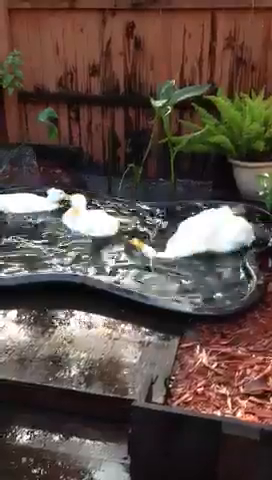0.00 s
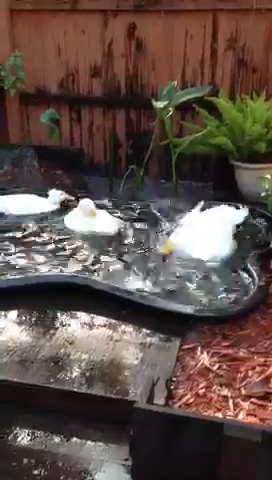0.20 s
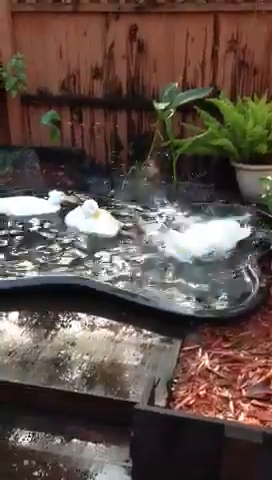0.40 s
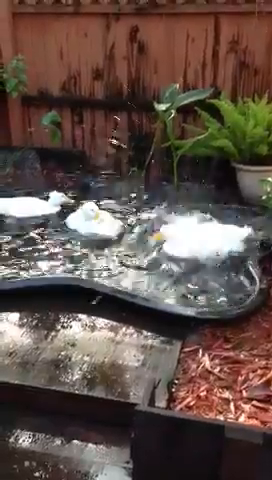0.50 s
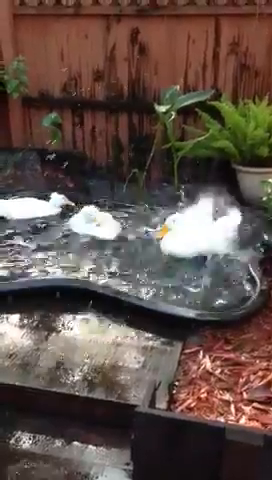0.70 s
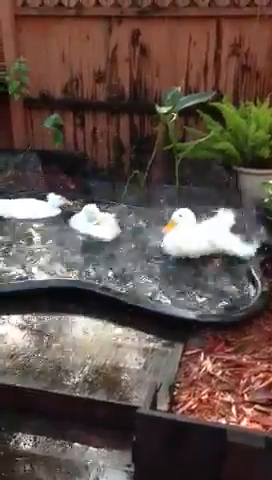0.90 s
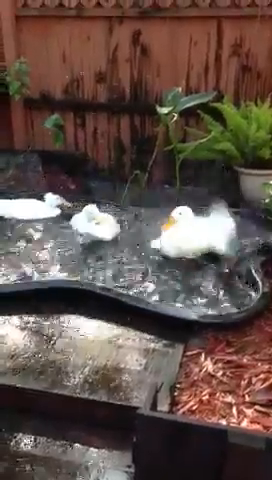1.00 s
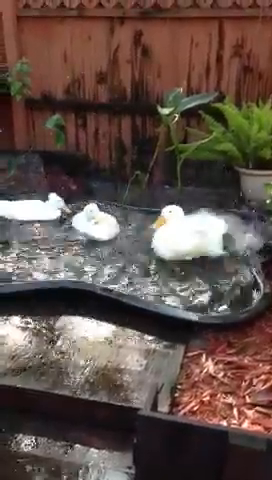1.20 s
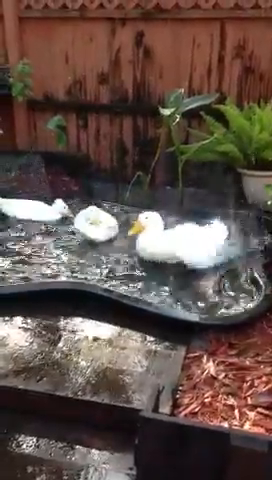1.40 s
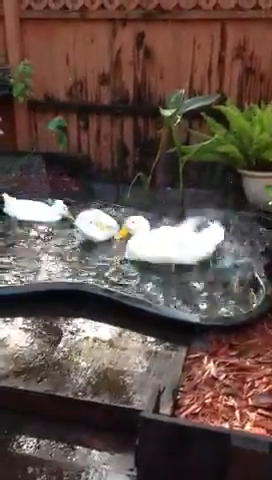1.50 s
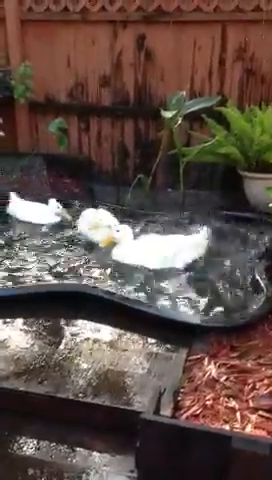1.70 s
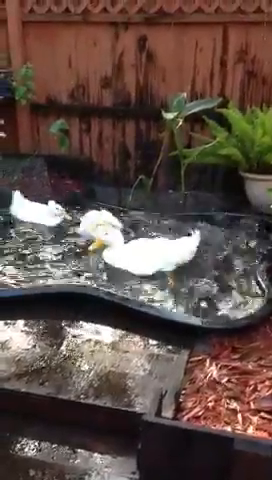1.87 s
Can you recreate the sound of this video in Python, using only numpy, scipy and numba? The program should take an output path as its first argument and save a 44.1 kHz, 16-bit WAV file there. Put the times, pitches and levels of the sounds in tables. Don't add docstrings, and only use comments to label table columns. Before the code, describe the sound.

Duck bathing in a garden pond: wing slaps crack on the water, then drops tick and fizz out

```python
import sys
import numpy as np
from scipy import signal
from scipy.fft import rfft, irfft
from scipy.io import wavfile
from scipy.ndimage import uniform_filter1d
from numba import njit

SR = 44100
rng = np.random.default_rng(int(sys.argv[2]) if len(sys.argv) > 2 else 0)


def volts(x):
    e = np.asarray(x, float) / 20
    return 10 ** e


def wav_out(sig):
    wavfile.write(sys.argv[1], SR, np.round(np.clip(np.atleast_2d(sig).T, -1, 1) * 32767).astype(np.int16))


N = 85995


def unit(x):
    return x / np.sqrt(np.mean(x ** 2))


def spectrum_db(table, hz):
    f, db = np.array(table).T
    return np.interp(np.log(np.maximum(hz, 1)), np.log(f), db)


def noise(table, lean=lambda hz: 1):
    hz = np.arange(N // 2 + 1) * SR / N
    gain = volts(spectrum_db(table, hz)) * lean(hz)
    return unit(irfft(rfft(rng.standard_normal(N)) * gain, N))


def walk(rate_hz):
    k = int(SR / rate_hz)
    steps = np.repeat(rng.standard_normal(N // k + 1), k)
    return 1.35 * uniform_filter1d(uniform_filter1d(steps, k), k)[:N]


@njit
def ring(start, hz, size, cycles, rise, onset, n, sr):
    out = np.zeros(n)
    for k in range(len(start)):
        f, phase, first = hz[k], 0., int(start[k] * sr)
        fade = np.exp(-f / (cycles[k] * sr))
        swell = np.exp(-f / (onset * cycles[k] * sr))
        level, unswollen, climb = size[k], 1., 1 + rise * f / sr
        last = min(n, first + int(6 * cycles[k] * sr / hz[k]))
        for i in range(max(first, 0), last):
            out[i] += level * (1 - unswollen) * np.sin(phase)
            phase += 2 * np.pi * f / sr
            level *= fade
            unswollen *= swell
            f = min(f * climb, .45 * sr)
    return out


def bubbles(start, hz, size, cycles, rise=0.01247):
    start = np.asarray(start, float)
    hz = np.clip(hz, 100, 15000.) + 0 * start
    cycles = np.maximum(cycles, .3) + 0 * start
    onset_share = .3
    return ring(start, hz, size + 0 * start, cycles, float(rise), onset_share, N, float(SR))


# (frequency [Hz], level [dB per Hz])
WATER_COLOUR = [(240, -47), (400, -11.5), (633, -11.5), (2030, -6), (3510, -5), (7210, -5), (13100, -14),
                (15500, -32)]


def swarm(start, hz, octaves, cycles, scatter_db):
    u = rng.random((len(start), 2))
    f = np.clip(hz * 2 ** (octaves * rng.standard_normal(len(start))), 250, 15000)
    loudness = np.minimum(-np.log(u[:, 0]), 2.2)
    size = volts(scatter_db * loudness + .5 * spectrum_db(WATER_COLOUR, f)) * np.sqrt(f)
    return unit(bubbles(start, f, size, cycles * (.5 + u[:, 1])))


def spray(hz):
    spread_octaves = 4.8
    return noise(WATER_COLOUR, lambda f: np.exp(-.5 * (np.log2(np.maximum(f, 1) / hz) / spread_octaves) ** 2))


# (time [s], level [dB], rise [s], fall [s],
# centre [Hz])
SPLASHES = [(.228, -42.5, 0.018, 0.036, 3410), (.27, -63, 0.003, 0.014, 3260),
            (0.319, -41.5, 0.0028, 0.0067, 1685), (.333, -28, .009, 0.0039, 2788),
            (.465, -40, 0.0032, 0.0085, 3850), (.485, -42, 0.0088, 0.0086, 1830),
            (.527, -39.5, 0.0022, 0.009, 3500), (.55, -41, 0.015, 0.021, 1910),
            (.672, -38.5, 0.011, 0.027, 1840), (0.763, -38, 0.0086, 0.0066, 2510),
            (.805, -38.5, 0.022, 0.014, 2540), (.829, -34.5, 0.0039, 0.0058, 6000),
            (.962, -29.5, 0.0087, 0.0079, 3430), (.98, -39.5, 0.0035, 0.017, 3800),
            (1.0818, -20.5, 0.00094, 0.0026, 4360), (1.095, -54, 0.023, 0.013, 2920),
            (1.194, -43.5, .004, 0.0077, 1950), (1.213, -33, 0.002, 0.0099, 3900),
            (1.318, -39.5, 0.0036, 0.0073, 718), (1.3352, -27.5, 0.0013, 0.0035, 4190),
            (1.39, -44, 0.021, 0.016, 1720), (1.481, -30.5, 0.0012, 0.006, 4920),
            (1.671, -46, 0.011, 0.0071, 4640), (1.695, -45, 0.0053, 0.0051, 3380),
            (.03, -60, 0.011, 0.078, 6070), (.208, -50, 0.0011, .015, 2980), (.7, -55, 0.0073, 0.0052, 3600),
           (.783, -37.5, 0.0053, 0.0067, 3920), (1.135, -80, .015, 0.017, 1600),
           (1.52, -50.5, 0.0083, 0.027, 1810), (1.756, -52.5, 0.0049, 0.0043, 4530),
           (1.812, -50.5, 0.0093, 0.0061, 4950), (1.889, -61, 0.0068, 0.0058, 4600),
           (.088, -53, 0.0035, 0.0065, 3330), (1.45, -46.5, 0.004, 0.0054, 2480)]


def splashes(t, count=130):
    spray_db = -5
    out = np.zeros(N)
    for s, db, rise, fall, hz in SPLASHES:
        rise, fall = max(rise, 3e-4), max(fall, 1e-3)
        u = rng.random((count, 2))
        side = np.where(u[:, 1] < rise / (rise + fall), rise, -fall)
        start = s + .5 * np.log(u[:, 0]) * side
        burst = swarm(start, hz, 1.0, 3.5, 5) * np.sqrt((rise + fall) / 2 * SR / N)
        swell = np.exp(np.where(t < s, (t - s) / rise, (s - t) / fall))
        out += volts(db) * (burst + volts(spray_db) * swell * spray(hz))
    return out


# (time [s], crack [dB], crack [Hz], body [dB], body [Hz])
SLAPS = [
    (0.325, -12.5, 2450, -40, 1200),
    (0.9621, -9, 3030, -23.5, 500),
    (1.0816, -10, 3750, -20, 306),
    (1.2099, -14, 1070, -34, 490),
    (1.3352, -9.5, 2270, -22, 604),
    (1.4826, -11.5, 2700, -16.5, 567),
]


def slaps():
    s, db, hz, body_db, body_hz = np.array(SLAPS).T
    crack = bubbles(s, hz, volts(db - 4.0), .9, 0)
    body = bubbles(s, body_hz, volts(body_db - 8.5), 1.2)
    return crack + body


# (time [s], pitch [Hz], peak level [dB], ringing [cycles])
POCKETS = [(.312, 1330, -24, 1.5), (0.311, 2880, -33, 3), (0.3242, 1710, -17.5, 0.95),
           (0.326, 2680, -29, 3.9), (0.3341, 2080, -22, 2.2), (0.3309, 5160, -29, 2.5),
           (0.9552, 1290, -30.5, 2.4), (.9555, 3070, -31, 2.5), (.9592, 1080, -18.5, 0.7),
           (0.9638, 2800, -36, 1.3), (0.964, 5800, -19, 2.6), (1.0668, 600, -31, 1),
           (1.0812, 5760, -13.5, 2.8), (1.0818, 2080, -15.5, 2), (1.0812, 593, -25, 0.75),
           (1.084, 2630, -29, 1.4), (1.1906, 1150, -36, 2.2), (1.1928, 2880, -27, 3.6),
           (1.198, 1250, -41, 1.8), (1.213, 5600, -21, 3.7), (1.2132, 1930, -20.5, 0.76),
           (1.317, 890, -29, 0.98), (1.3297, 880, -22.5, 0.78), (1.3358, 1880, -20, 2.2),
           (1.4795, 1360, -21, 0.98), (1.4793, 7100, -19, 3.8), (1.4844, 1810, -15.5, 1.85),
           (1.498, 3900, -30, 3), (.447, 2460, -38.5, 6.8), (.507, 1610, -33, 4), (.526, 2900, -31, 4),
           (.539, 1030, -33.5, 5), (0.548, 1370, -29, 3.8), (0.549, 1890, -33, 6.8), (0.555, 2630, -27, 5),
           (.6, 1160, -35.5, 4.4), (.659, 2660, -27.5, 4.6), (0.6667, 2100, -25.5, 3),
           (.666, 3050, -28, 3.1), (.68, 1550, -33, 3), (0.703, 2850, -32, 4), (.754, 1450, -32, 7.8),
           (0.7652, 2290, -28, 2.8), (.805, 1710, -30, 3.4), (.81, 1180, -33, 2.8), (0.329, 1430, -32, 1.1),
           (.322, 2300, -26, 2.8), (0.338, 2580, -31, 2.5), (1.3351, 3280, -17.5, 1.6),
           (1.082, 1010, -20, 1)]


def pockets():
    s, hz, db, cycles = np.array(POCKETS).T
    return bubbles(s, hz, volts(db + 2), cycles, rise=0.0076)


# (time [s], pitch [Hz], peak level [dB], ringing [cycles])
BUBBLES = [(0.0874, 2570, -29, 3.1), (0.104, 779, -36.5, 12), (0.27, 3050, -27, 6.1),
           (0.3164, 2800, -19.5, 3.8), (0.3312, 1640, -14, 1.3), (.444, 666, -37.5, 4.8),
           (.477, 1980, -30.5, 6.7), (.488, 950, -26.5, 2.1), (.6735, 865, -23, 2.15),
           (0.7642, 1530, -26, 3.8), (0.884, 1700, -44, 7.2), (1.178, 1247, -39, 12),
           (1.256, 1147, -36, 7.2), (1.36, 1920, -37.5, 8.7), (1.451, 800, -35, 2.6),
           (1.483, 898, -24, 3.5), (1.54, 760, -36.5, 2.4), (1.587, 1250, -41, 7.1),
           (1.608, 4430, -35.5, 6.5), (1.6695, 3250, -30, 3.8), (1.676, 4660, -28.5, 3.3),
           (1.679, 3830, -27.5, 3), (1.678, 1550, -38, 4.4), (1.706, 1095, -41.5, 4.9),
           (.165, 1000, -33, 2), (1.4815, 535, -23, 2.1), (1.752, 4060, -35, 4.2),
           (1.7588, 3050, -31.5, 3.5), (1.815, 3300, -35.5, 3.6), (1.8876, 4530, -34, 4.3),
           (1.0812, 2000, -10.5, 1.3)]


def single_bubbles():
    s, hz, db, cycles = np.array(BUBBLES).T
    return bubbles(s, hz, volts(db + 0.5), cycles, rise=.005)


# (time [s], start pitch [Hz], peak level [dB], ringing [cycles], rise [per cycle])
CHIRPS = [
    (.128, 818, -41, 22, 0.0172),
    (.186, 474, -47, 5.6, 0.048),
    (.304, 786, -40, 8, .07),
    (0.884, 987, -38.5, 13.5, 0.024),
    (1.729, 2460, -40.5, 24, 0.0092),
]


def chirps(t):
    burst_s = .004
    out = np.zeros(N)
    for s, hz, db, cycles, rise in CHIRPS:
        until_burst = np.clip((s + cycles / hz - t) / burst_s, 0, 1)
        out += bubbles([s], hz, volts(db + 0.5), cycles, rise) * until_burst
    return out


# (time [s], peak level [dB], pitch [Hz])
THUMPS = [(0.274, -38.5, 276), (0.315, -38.5, 186), (0.945, -32.5, 289), (0.959, -33, 194),
          (1.0745, -32.5, 200), (1.206, -35, 286), (1.315, -42, 239), (1.477, -38.5, 222),
          (1.276, -46, 313), (1.329, -44, 270), (1.553, -50, 330)]


def thumps():
    s, db, hz = np.array(THUMPS).T
    return bubbles(s, hz, volts(db + 6.5), 1.4, rise=0.012)


# (time [s], pitch [Hz], peak level [dB])
DROPS = [(0.0772, 9200, -38), (.119, 7160, -39.5), (0.192, 8100, -43), (.868, 4970, -28.5),
         (0.972, 7240, -25), (1.0525, 7360, -32), (1.287, 4440, -31), (1.3307, 7900, -23),
         (1.5066, 6700, -31), (1.584, 4600, -41), (1.589, 6500, -46), (1.618, 5340, -36.5),
         (1.7, 10500, -37), (1.7336, 5760, -39), (1.759, 6240, -42.5), (1.798, 4400, -41),
         (1.815, 5600, -49), (.829, 9800, -31.5), (0.869, 7300, -35), (1.482, 11460, -28),
         (0.239, 6460, -34), (.261, 5500, -34.5), (.467, 6060, -27.5), (.52, 5100, -29.5),
         (0.578, 6300, -32)]


def drops():
    ring_s = .00033
    s, hz, db = np.array(DROPS).T
    return bubbles(s, hz, volts(db + 9.0), ring_s * hz, rise=0)


# (time [s], level [dB])
STIR = [(0.0, -62.5), (0.14, -57), (0.27, -46.5), (0.412, -46), (0.678, -42), (0.944, -46), (1.314, -44),
        (1.618, -49), (1.802, -56), (1.95, -58)]


def churn(t, fizz_count=6000, gurgle_count=700):
    fizz = swarm(rng.random(fizz_count) * N / SR, 3988, 1.258, 3.1, 2.5)
    gurgle = swarm(rng.random(gurgle_count) * N / SR, 1300, .6, 8, 3.5)
    mix = volts(-3.5) * fizz + volts(-7) * gurgle + volts(-9.5) * noise(WATER_COLOUR)
    s, db = np.array(STIR).T
    flicker_db = 1.5 * walk(30.32)
    return mix * volts(np.interp(t, s, db) + flicker_db)


def yard(x):
    fence_s, fence_db = .012, -19
    t60_s, scatter_db = .15, -11.5
    t = np.arange(SR // 4) / SR
    tail = rng.standard_normal(len(t)) * 10 ** (-3 * t / t60_s) * np.clip(t / 0.0039, 0, 1)
    tail = volts(scatter_db) * tail / np.sqrt(np.sum(tail ** 2))
    echo = np.interp(np.arange(N) - fence_s * SR, np.arange(N), x)
    return x + volts(fence_db) * echo + signal.fftconvolve(x, tail)[:N]


# (frequency [Hz], level [dB rms])
PUMP = [(157.2, -57.5), (314, -68)]


def pump(t):
    drift, wobble_db = .0018, 1.2
    late = t + np.cumsum(drift * walk(7.6)) / SR
    out = np.zeros(N)
    for hz, db in PUMP:
        level = volts(db + wobble_db * walk(35.77))
        out += level * np.sqrt(2) * np.sin(2 * np.pi * hz * late)
    return out


# (frequency [Hz], level [dB per Hz])
GARDEN_COLOUR = [(60, -28.5), (120, -6.5), (190, 0), (320, -5.5), (440, -11.5), (800, -7.5), (1600, -36),
                 (15500, -28.5)]


def garden():
    air = volts(-55 + walk(2.64)) * noise(GARDEN_COLOUR)
    rumble = volts(-91.5) * noise([(20, -30), (60, 3), (100, -15), (200, -58)])
    return air + rumble


def scene():
    t = np.arange(N) / SR
    water = splashes(t) + slaps() + pockets() + single_bubbles() + chirps(t) + thumps() + drops() + churn(t)
    water = signal.sosfilt(signal.butter(3, 170, "high", fs=SR, output="sos"), water)
    return (yard(water) + pump(t) + garden())[None]


def roll_off(x):
    return signal.sosfilt(signal.butter(12, 16410, fs=SR, output="sos"), x)


def record(dry):
    mix = signal.sosfilt(signal.ellip(12, .2, 55, 15330, fs=SR, output="sos"), dry)
    return roll_off(mix)


dry = scene()
out = record(dry)
wav_out(out)
```